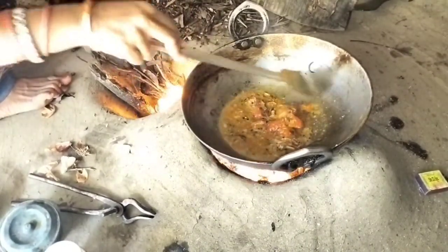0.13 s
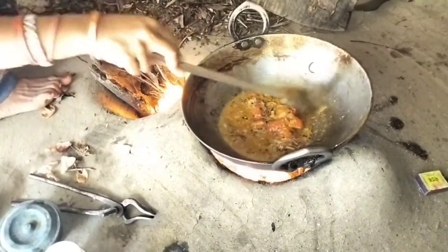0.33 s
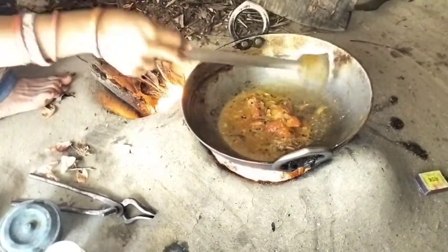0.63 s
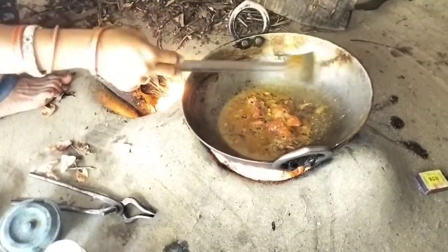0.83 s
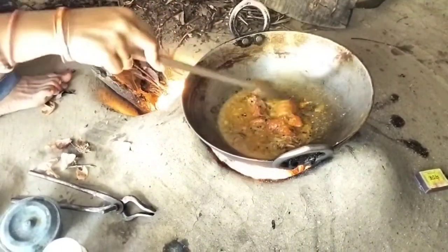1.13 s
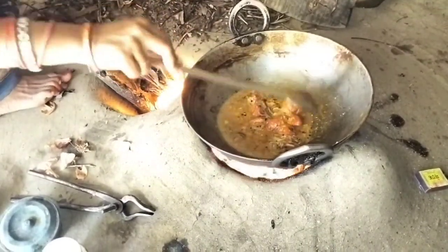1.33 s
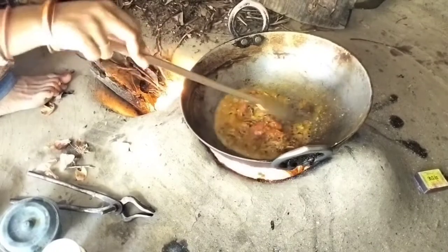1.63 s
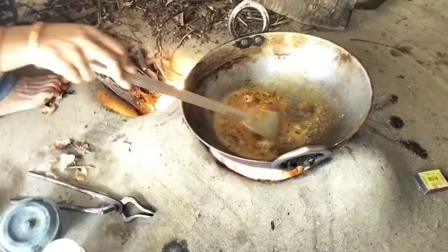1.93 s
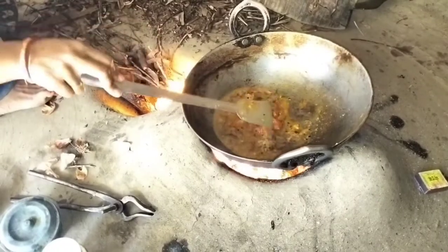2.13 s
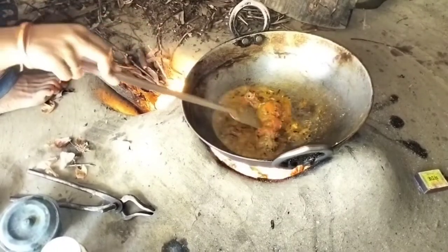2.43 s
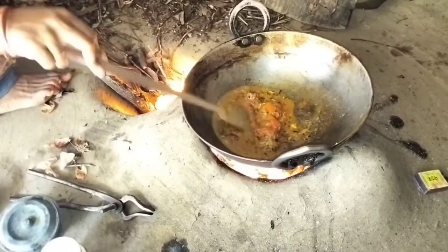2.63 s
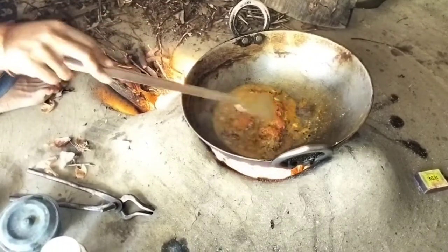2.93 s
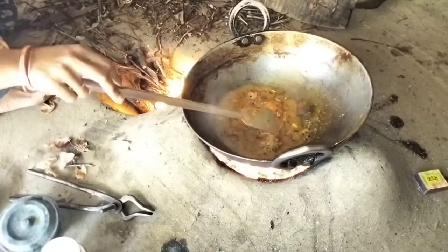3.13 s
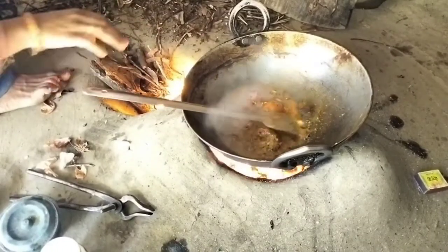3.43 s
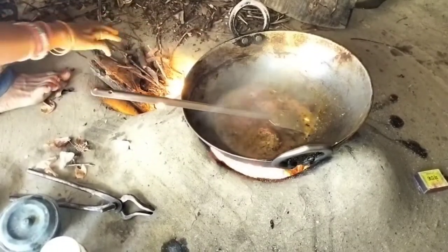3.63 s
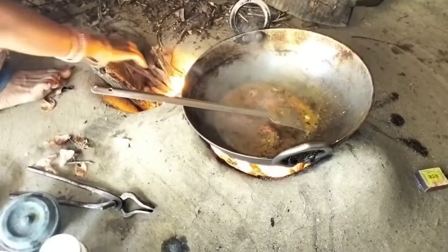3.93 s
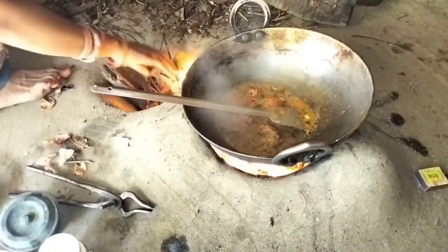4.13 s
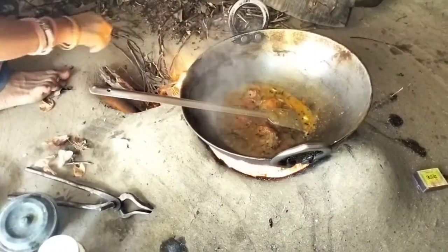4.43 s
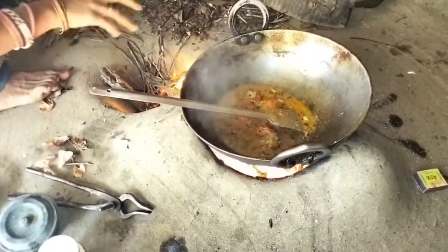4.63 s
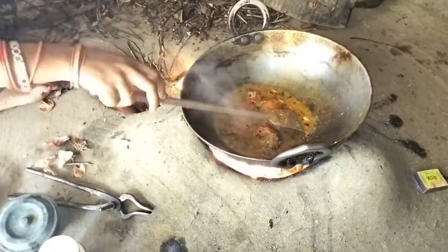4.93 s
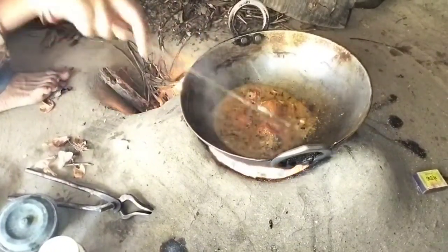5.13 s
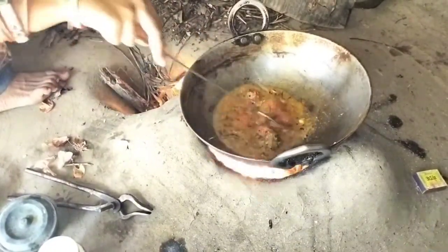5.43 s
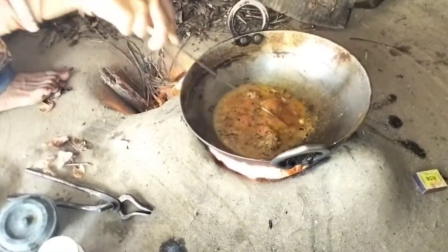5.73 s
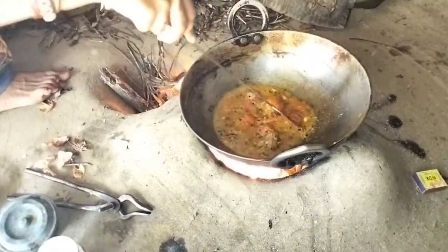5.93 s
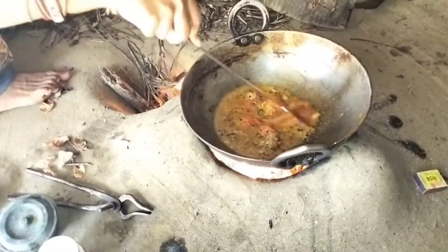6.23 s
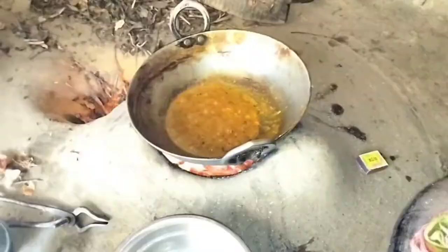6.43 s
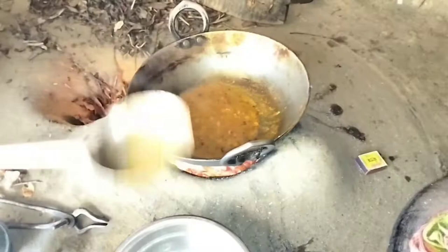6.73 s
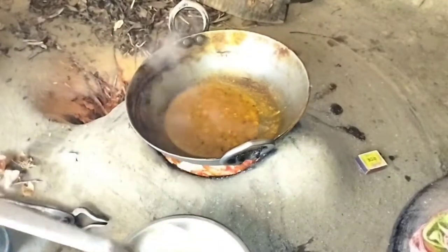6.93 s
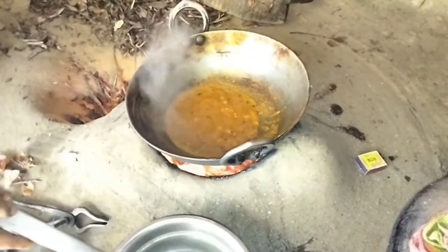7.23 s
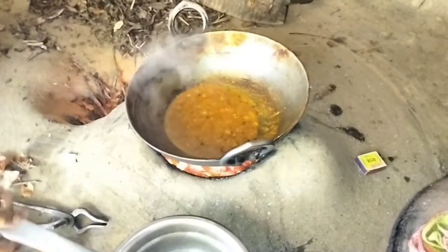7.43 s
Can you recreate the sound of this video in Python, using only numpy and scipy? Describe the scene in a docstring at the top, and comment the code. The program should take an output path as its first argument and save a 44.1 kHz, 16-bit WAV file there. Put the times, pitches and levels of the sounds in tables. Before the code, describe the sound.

Close, crackling frying with sharp metal spatula knocks and a clattering drop on the rim, cutting abruptly to quiet bubbling and a tinny dish rattle.

```python
"""Sizzle first: spice paste fries in an iron pan on an outdoor clay wood stove, heard from close by.
Random bursts with flickering tone, coloured by the pan's bowl, make the frying and then the quiet simmer.
A spatula knocks, scrapes, then drops and rattles; a dish clanks late: damped modes plus noise smacks.
Swept sines make faint whistles in the simmer; low-passed noise makes fire rumble, breeze and puffs."""
import sys
import numpy as np
from scipy import signal
from scipy.fft import rfft, irfft, next_fast_len
from scipy.io import wavfile
from scipy.ndimage import map_coordinates

SR = 44100
rng = np.random.default_rng(int(sys.argv[2]) if len(sys.argv) > 2 else 0)


def file_out(sig):
    """Save sig as 16-bit WAV at sys.argv[1]."""
    # one column per channel
    cols = np.atleast_2d(sig).T
    # limit, then scale
    lim = np.clip(cols, -1, 1)
    pcm = np.round(lim * 32767).astype(np.int16)
    wavfile.write(sys.argv[1], SR, pcm)


N = 335153

# Bubble burst spectrum: freq_hz, density_db_per_hz
BUBBLE_SPECTRUM = [(60, -13), (150, -13.5), (250, -8), (450, -5), (700, -4), (1200, -1.5), (2300, -1.5),
                   (3500, -2.5), (5000, -7), (7000, -11), (14000, -12)]
# Fine spray spectrum: freq_hz, density_db_per_hz
SPRAY_SPECTRUM = [(1000, -24), (3000, 1), (5000, 2), (6500, 0.5), (7800, -0.5), (8800, -1.5), (9400, 3.5),
                  (11300, 5), (12500, 4.5), (14300, 1.5)]
# Gravy burst spectrum: freq_hz, density_db_per_hz
GRAVY_SPECTRUM = [(100, -11), (200, -11), (300, -13.5), (530, -11.5), (1000, -11), (1800, -10), (2600, -13),
                  (4500, -15.5), (6000, -19), (8200, -23), (10000, -19), (14300, -20)]
# Hollow resonances of the pan's bowl: centre_hz, width_hz, gain_db
BOWL_RESONANCES = [(198, 16, 4), (319, 25, -6), (340, 35, 1), (481, 26, -15), (531, 50, 5.5),
                   (710, 140, 2.5), (1144, 35, 5), (1310, 46, -1), (1564, 37, 0.5), (2174, 180, 4),
                   (2580, 69, 3)]
# Left-right likeness: freq_hz, correlation (no unit)
EAR_LIKENESS = [(60, 0.98), (150, 1), (330, 0.89), (700, 0.71), (1400, 0.57), (3000, 0.28), (6000, 0),
                (14000, 0.044)]
# Left-right balance: freq_hz, left_minus_right_db
EAR_BALANCE = [(60, -7), (130, -3.5), (290, -0.5), (640, 0), (1410, -1.5), (3100, -1.5), (6820, -2),
               (15000, -4)]
# Flares of spray as wet paste meets hot iron: peak_s, peak_db, rise_sigma_s
SPRAY_FLARES = [(.01, -35.5, .03), (.36, -34.5, 0.044), (0.959, -30.5, 0.075), (2.3, -41.5, 0.22),
                (2.85, -38, 0.33), (3.3, -45, .15), (3.98, -41.5, 0.11), (4.601, -43, .2),
                (4.981, -45.5, .15), (5.72, -45.5, .015), (6.05, -48.5, 0.08), (6.39, -38, .03)]
# Held spatula knocks: start_s, clash_db, thud_db, pan_ring_db, brightness_db_per_octave, thud_centre_hz
HELD_KNOCKS = [(.2945, -24.5, -21.5, -55, 1, 230), (.7540, -12.5, -20.5, -19, -1.6, 480),
               (1.4263, -15.5, -19.5, -33, 1.5, 367), (1.868, -17, -22.5, -36, 0.5, 430)]
# Dropped spatula bounces on the rim: start_s, clash_db
RIM_BOUNCES = [(3.285, -22.5), (3.2946, -25.5), (3.3196, -25.5), (3.348, -23.5), (3.3744, -26),
               (3.394, -22.5), (3.4108, -27.5), (3.477, -24)]
# Pan modes: freq_hz, relative_db, t60_s
PAN_MODES = [(196, -23, 0.17), (518.3, -2.5, 0.31), (827, -9, 0.37), (1300, -20, 0.18), (1780, -3.5, 0.31),
             (1910, -1, .13), (2120, -3, 0.17), (2196, -10, .12), (2320, -20, 0.12), (2838, 4.5, 0.25),
             (3160, 0, 0.28), (3660, -11, 0.4), (4410, -4, 0.16), (4963, -35, .14), (5100, -5.5, 0.14),
             (5470, -20, .1), (5930, -26, .1), (9840, 1, 0.15)]
# Spatula modes: freq_hz, relative_db, t60_s
BLADE_MODES = [(212.2, -5, 0.36), (569.5, -3, 0.32), (591, -8, 0.36), (1343, -3.5, 0.16), (1534, -2, 0.25),
               (2210, -1, 0.25), (2747, -11, 0.16), (3270, 3.5, 0.36), (3680, -12, 0.1), (3682, 7, 0.12),
               (3920, -1.5, 0.15), (4310, 1, 0.13), (4500, -5, .14), (4876, 2, 0.22), (5100, 6, 0.098),
               (4870, -12, .11), (5400, -17, 0.13), (6800, -6, 0.18), (9420, -2.5, 0.22)]
# Dull modes of cookware on clay: freq_hz, relative_db, t60_s
THUD_MODES = [(161, -9, 0.068), (210.5, 1.5, 0.083), (245, -2.5, 0.1), (298, -0.5, 0.103), (363, -2, 0.14),
              (457, -0.5, 0.069), (533.6, -1, 0.15), (617, -3, 0.1), (724, -5.5, 0.15), (865, 5.5, 0.042),
              (1075, 2.5, 0.027), (1272, 4.5, 0.02)]
# Metal clash spectrum: freq_hz, density_db_per_hz
CLASH_SPECTRUM = [(100, -38), (300, -6), (900, -5), (2100, 3), (3500, 1.5), (4400, -4), (5600, 4.5),
                  (7500, -3), (11000, -2.5), (14500, -6)]
# Blade strokes over the iron: centre_s, sigma_s, rasp_db, groan_db
BLADE_STROKES = [(0.371, 0.018, -46, -40.5), (0.961, 0.039, -34, -34.5), (1.422, 0.0056, -33, -42),
                 (1.863, 0.0046, -37, -42), (6.386, 0.042, -42, -68)]
# Rasp spectrum: freq_hz, density_db_per_hz
RASP_SPECTRUM = [(300, -20), (550, 0), (900, 3), (2100, 4), (3200, -3), (5000, -8), (8000, -3),
                 (14000, -27)]
# Dish knocks: start_s, clash_db
DISH_CLANKS = [(7.456, -37), (7.483, -16), (7.505, -27.5), (7.528, -30), (7.571, -26.5), (7.597, -21.5)]
# Dish modes: freq_hz, relative_db, t60_s
DISH_MODES = [(458, -14, 0.51), (556, -8, 0.48), (690, -6.5, 0.17), (972, 1, 0.37), (994, -4, 0.19),
              (1110, -15, 0.14), (1328, -3, 0.21), (1410, 6, 0.092), (1520, 2, 0.21), (2010, -9.5, 0.38),
              (2300, -16, 0.38), (2550, -15, 0.17), (2917, -3, 0.27), (3700, -8, 0.12), (3790, -7, 0.24),
              (4070, -15, 0.17), (4770, -15, .15), (5153, -5, 0.14)]
# Crowded dish modes: freq_hz, density_db_per_hz
TINNY_SPECTRUM = [(150, 1), (450, -13), (950, 5.5), (1450, 2), (1750, 0.5), (2900, -5.5), (3900, 2),
                  (5200, -8), (7000, -10), (10000, -9), (14000, -15)]
# Thin whistles: centre_s, sigma_s, start_hz, end_hz, level_db
WHISTLE_GLIDES = [(6.52, 0.028, 4450, 4570, -57), (6.664, 0.062, 1634, 1774, -53.5)]
# Air puffs on the microphone: centre_s, fifth_of_length_s, level_db, upper_edge_hz
AIR_PUFFS = [(4.149, 0.035, -51, 220), (4.85, 0.016, -43.5, 170), (5.121, 0.069, -50.5, 149),
             (5.297, 0.04, -47.5, 70), (5.59, 0.016, -40.5, 81), (5.744, 0.019, -39.5, 168),
             (7.095, 0.022, -47, 220), (7.222, 0.044, -45, 99), (7.307, .014, -39.5, 104)]

SIMMER_START_S, SIMMER_DB, FADE_S = 6.432, -46, 0.0056
BUBBLING_DB, SPRAY_DB = -40.5, -43  # steady frying, before the turn and flares
TURN_S, TURN_DB, TURN_RISE_S = 1.694, 3.5, 0.045  # paste pushed into the oil bubbles harder
DRYING_DB_PER_S = 31  # a flare dies as its water boils off
FLARE_BUBBLES_DB = -9  # relative to the flare's spray
SPIT_DB = -16  # larger drops flashing to steam, relative to bubbling
HELD_RING_DB, FREE_RING_DB = -18, -3.5  # spatula ring relative to clash; the hand damps it
BOUNCE_THUD_DB, BOUNCE_PAN_DB = -9.5, -10  # relative to clash
BOUNCE_THUD_HZ, BOUNCE_BRIGHT_DB_PER_OCTAVE = 230, -1
SKID_S = 0.00094  # the handle skids as it lands: attack time constant
PORT_LAG_S = 0.00006  # the pan stands to the right; left port hears it later
GROAN_HZ, GROAN_SHARE = 364.5, 0.34  # mean stick-slip pitch; groan sigma as share of stroke sigma
DISH_RING_DB, DISH_THUD_DB = -4, -36.5  # ring relative to clash; thud alike at every touch
FIRE_DB = -67.5  # before the left-right offset
BREEZE_S, BREEZE_DB, BREEZE_SWING_DB = 4.05, -61, 3.5  # before the left-right offset
TOP_HZ = 14290


def sizzle():
    """Steam bursts through oil as bubbles, fine spray and spits; flares make the bursts denser."""
    flare = flares()
    turned = np.clip((clock() - TURN_S) / TURN_RISE_S + 0.5, 0, 1)
    steady_power = amp(BUBBLING_DB + TURN_DB * turned) ** 2
    bubbling_db = 10 * np.log10(steady_power + amp(FLARE_BUBBLES_DB) ** 2 * flare)
    spray_db = 10 * np.log10(amp(SPRAY_DB) ** 2 + flare)
    activity = amp(spray_db - np.median(spray_db))

    bubble_pops = flickering(bursts(9000 * activity, spread_db=2.5), depth_db=2)
    bubbles = amp(bubbling_db + 0.62 * wobble(30)) * placed(bubble_pops, in_bowl(BUBBLE_SPECTRUM))
    spray_pops = flickering(bursts(22000 * activity, spread_db=1.5), depth_db=3.5)
    spray = amp(spray_db + 0.39 * wobble(29)) * placed(spray_pops, in_bowl(SPRAY_SPECTRUM))
    spits = amp(bubbling_db + SPIT_DB) * placed(bursts(72, spread_db=2), in_bowl(CLASH_SPECTRUM))
    return bubbles + spray + spits


def flares():
    """Power of extra spray: each flare swells to its peak, then dries away."""
    power = np.zeros(N)
    for peak_s, peak_db, rise_s in SPRAY_FLARES:
        drying = amp(-DRYING_DB_PER_S * np.maximum(clock() - peak_s, 0))
        shape = np.where(clock() < peak_s, swell(peak_s, rise_s), drying)
        power += (amp(peak_db) * shape) ** 2
    return power


def simmer():
    """Gravy bubbles softly, with fewer and rounder bursts than frying."""
    pops = flickering(bursts(3000, spread_db=0.5), depth_db=3)
    return amp(SIMMER_DB + 1.2 * wobble(16)) * placed(pops, in_bowl(GRAVY_SPECTRUM))


def spatula():
    """Held, it knocks with a damped ring; let go, it rattles on the rim and rings freely."""
    track = np.zeros((2, N))
    for start_s, clash_db, thud_db, pan_db, bright_db, centre_hz in HELD_KNOCKS:
        blade_db = clash_db + HELD_RING_DB
        add(track, start_s, contact(clash_db, thud_db, pan_db, blade_db, bright_db, centre_hz))
    for start_s, clash_db in RIM_BOUNCES:
        sound = contact(clash_db, clash_db + BOUNCE_THUD_DB, clash_db + BOUNCE_PAN_DB,
                        clash_db + FREE_RING_DB, BOUNCE_BRIGHT_DB_PER_OCTAVE, BOUNCE_THUD_HZ)
        attack = 1 - np.exp(-np.arange(sound.shape[1]) / SR / SKID_S)
        add(track, start_s, sound * attack)
    # half the lag delays the left, half advances the right
    return filtered(track, lambda hz: np.exp(1j * np.pi * PORT_LAG_S * np.outer([-1, 1], hz)))


def contact(clash_db, thud_db, pan_db, blade_db, bright_db, centre_hz):
    """One contact thumps the pan on its clay seat; bare metal clashes, pan and spatula ring."""
    sound = amp(thud_db) * thud(centre_hz)
    pan_ring = amp(pan_db) * ring(PAN_MODES, scatter_db=2.5)
    blade_ring = amp(blade_db) * ring(BLADE_MODES, scatter_db=1.5)
    sound += amp([[-1.3], [1.3]]) * (pan_ring + blade_ring)
    clash = smack(CLASH_SPECTRUM, bright_db, t60=0.012, tail_db=-3, tail_t60=0.17, ridges_db=9)
    add(sound, 0, amp(clash_db) * clash)
    return sound


def scrapes():
    """The blade catches and slips on iron: a rasp, and an unsteady stick-slip groan of the handle."""
    rasp = placed(bursts(1800, spread_db=3), in_bowl(RASP_SPECTRUM))
    groan = tone(GROAN_HZ * (1 + 0.06 * wobble(200)))
    track = np.zeros((2, N))
    for centre_s, sigma_s, rasp_db, groan_db in BLADE_STROKES:
        track += amp(rasp_db) * swell(centre_s, sigma_s) * rasp
        track += amp(groan_db) * swell(centre_s, GROAN_SHARE * sigma_s) * groan
    return track


def dish():
    """A thin metal dish is knocked and chatters, a little to the right: ring, clash and thud."""
    track = np.zeros((2, N))
    for start_s, clash_db in DISH_CLANKS:
        clash = smack(TINNY_SPECTRUM, 0, t60=0.011, tail_db=-6.5, tail_t60=0.22, ridges_db=7.5)
        add(track, start_s, amp(clash_db + DISH_RING_DB) * ring(DISH_MODES, scatter_db=1))
        add(track, start_s, amp(clash_db) * clash)
        add(track, start_s, amp(DISH_THUD_DB) * thud(centre_hz=480))
    return track * amp([[-1.9], [1.9]])


def whistles():
    """Thin wavering tones glide up in pitch while they swell and fade."""
    track = np.zeros(N)
    for centre_s, sigma_s, start_hz, end_hz, level_db in WHISTLE_GLIDES:
        glide_s = [centre_s - 2 * sigma_s, centre_s + 2 * sigma_s]
        pitch_hz = np.interp(clock(), glide_s, [start_hz, end_hz])
        wavering = tone(pitch_hz * (1 + 0.012 * wobble(160)))
        track += amp(level_db) * swell(centre_s, sigma_s) * wavering
    return track


def air():
    """Fire rumbles; a breeze sets in; puffs buffet each microphone port on its own."""
    fire = amp(FIRE_DB) * low_noise(N, edge_hz=170)
    onset = np.clip((clock() - BREEZE_S) / 0.1, 0, 1)
    breeze = onset * amp(BREEZE_DB + BREEZE_SWING_DB * wobble(10))
    track = fire + breeze * low_noise(N, edge_hz=147)
    for centre_s, fifth_s, level_db, edge_hz in AIR_PUFFS:
        shape = np.hanning(int(5 * fifth_s * SR))
        puff = amp(level_db) * shape * low_noise(len(shape), edge_hz)
        add(track, centre_s - len(shape) / SR / 2, puff)
    return track * amp([[2.5], [-2.5]])


def low_noise(size, edge_hz):
    """Low rumble: independent stereo noise of rms 1, between 35 Hz and edge_hz."""
    noise = rng.standard_normal((2, size))
    return unit(filtered(noise, lambda hz: hz / np.hypot(hz, 35) / np.sqrt(1 + (hz / edge_hz) ** 6)))


def bursts(rate, spread_db):
    """Tiny pops at random moments, rate per second, of random sign and size."""
    happens = rng.random((2, N)) < rate / SR
    sign = rng.choice([-1, 1], (2, N))
    return unit(happens * sign * amp(spread_db * rng.standard_normal((2, N))))


def flickering(pops, depth_db):
    """Uneven sizzle: random gains in short time-frequency patches make the pops' tone flicker."""
    patches = signal.stft(pops, nperseg=512)[2]
    gains = amp(depth_db * rng.standard_normal(patches.shape[1:]))
    return signal.istft(patches * gains, nperseg=512)[1][:, :N]


def in_bowl(spectrum):
    """A spectrum in dB with the bowl's resonances on it."""
    def colour(hz):
        level_db = along(spectrum, hz)
        for centre_hz, width_hz, gain_db in BOWL_RESONANCES:
            level_db = level_db + gain_db / (1 + (2 * (hz - centre_hz) / width_hz) ** 2)
        return level_db
    return colour


def thud(centre_hz):
    """The struck spot favours low modes near centre_hz, 2.3 dB down per octave away."""
    modes = [(hz, db - 2.3 * abs(np.log2(hz / centre_hz)), t60) for hz, db, t60 in THUD_MODES]
    return ring(modes, scatter_db=1)


def ring(modes, scatter_db):
    """One blow's decaying modes, each of new strength and out of step between the ears."""
    t = np.arange(SR // 2) / SR
    hz, db, t60 = np.transpose(modes)[..., None]
    size = amp(db + scatter_db * rng.standard_normal(hz.shape))
    apart = np.arccos(np.clip(along(EAR_LIKENESS, hz), 0, 1)) / 2 * rng.choice([-1, 1], hz.shape)
    phase = 2 * np.pi * (hz * t + rng.random(hz.shape))
    fading = size / np.linalg.norm(size) * decay(t, t60)
    return np.sqrt(2) * np.array([(fading * np.sin(phase + ear * apart)).sum(0) for ear in (-1, 1)])


def smack(spectrum, tilt_db, t60, tail_db, tail_t60, ridges_db):
    """A sharp crack, then a duller tail of crowded, damped modes: ridges in the spectrum."""
    t = np.arange(SR // 3) / SR
    grid_hz = np.arange(0, SR / 2, 30)
    ridges = np.column_stack([grid_hz, ridges_db * rng.standard_normal(len(grid_hz))])

    def crack_colour(hz):
        return along(spectrum, hz) + tilt_db * np.log2(hz / 4000 + 0.076)

    def tail_colour(hz):
        return crack_colour(hz) + along(ridges, hz) - np.log2(1 + hz / 4000)

    crack = placed(rng.standard_normal((2, len(t))), crack_colour)
    tail = placed(rng.standard_normal((2, len(t))), tail_colour)
    return crack * decay(t, t60) + amp(tail_db) * tail * decay(t, tail_t60)


def placed(pair, colour):
    """Two unrelated signals become coloured stereo of rms 1: bass alike in both ears, treble diffuse."""
    def mid_side(hz):
        turn = np.arccos(np.clip(along(EAR_LIKENESS, hz), 0, 1)) / 2
        return amp(colour(hz)) * [np.cos(turn), np.sin(turn)]

    mid, side = filtered(pair, mid_side)
    stereo = np.array([mid + side, mid - side])
    return unit(filtered(stereo, lambda hz: amp(np.outer([0.5, -0.5], along(EAR_BALANCE, hz)))))


def tone(hz):
    """A sine of rms 1 that follows a pitch curve."""
    return np.sqrt(2) * np.sin(2 * np.pi * np.cumsum(hz) / SR)


def decay(t, t60):
    """Exponential fall of 60 dB in t60 seconds."""
    return np.exp(-np.log(1000) * t / t60)


def swell(centre_s, sigma_s):
    """Gaussian rise and fall, peak 1."""
    return np.exp(-0.5 * ((clock() - centre_s) / sigma_s) ** 2)


def wobble(rate):
    """A smooth random curve, rate knots per second."""
    return map_coordinates(rng.standard_normal(int(N * rate / SR) + 4), [clock() * rate])


def clock():
    """Time of every sample in s."""
    return np.arange(N) / SR


def amp(db):
    """dB to amplitude."""
    return 10 ** (np.asarray(db) / 20)


def unit(x):
    """Scale to rms 1."""
    return x / np.sqrt(np.mean(x ** 2) + 1e-20)


def along(points, hz):
    """Interpolate (freq_hz, value) points on a log axis."""
    f, v = np.transpose(points)
    return np.interp(np.log(hz + 1), np.log(f + 1), v)


def filtered(x, response):
    """Multiply the zero-padded spectrum of x by a response of frequency."""
    size = x.shape[-1]
    m = next_fast_len(size + SR // 8)
    return irfft(rfft(x, m) * response(np.fft.rfftfreq(m, 1 / SR)), m)[..., :size]


def add(track, start_s, sound):
    """Mix a stereo sound into the track in place, cut at its end."""
    part = track[:, round(start_s * SR):][:, :sound.shape[1]]
    part += sound[:, :part.shape[1]]


def scene():
    """Frying gives way to simmering; knocks, whistles and air lie on top."""
    frying = np.clip((SIMMER_START_S - clock()) / FADE_S, 0, 1)
    food = frying * (sizzle() + scrapes()) + (1 - frying) * simmer()
    high_pass = signal.butter(2, 130, "high", fs=SR, output="sos")  # small objects radiate little bass
    knocks = signal.sosfilt(high_pass, spatula() + dish())
    return food + knocks + whistles() + air()


def record(dry):
    """The recorder keeps nothing above its band limit."""
    return filtered(dry, lambda hz: hz < TOP_HZ)


dry = scene()
out = record(dry)
file_out(out)
```